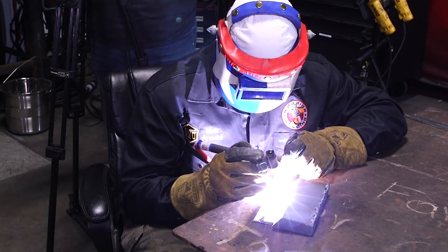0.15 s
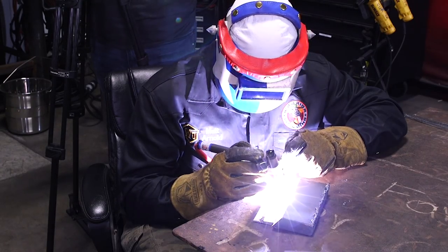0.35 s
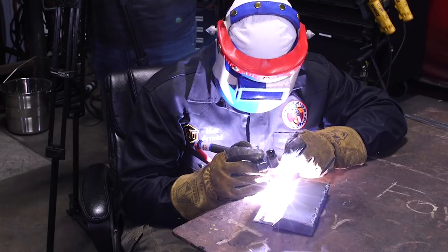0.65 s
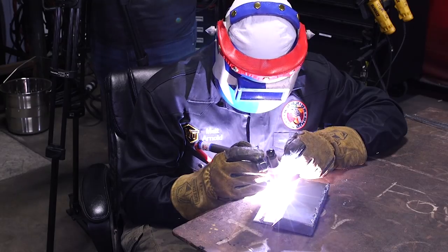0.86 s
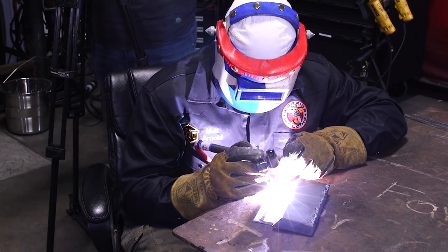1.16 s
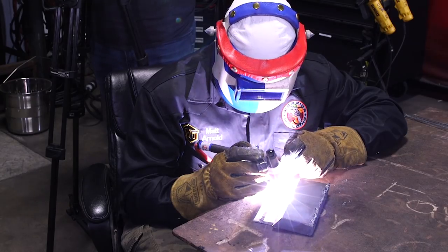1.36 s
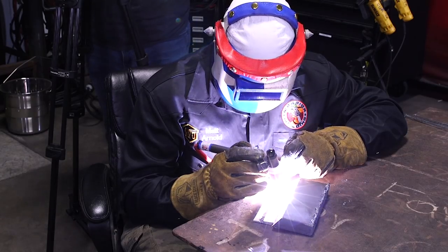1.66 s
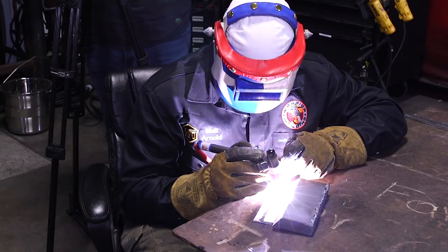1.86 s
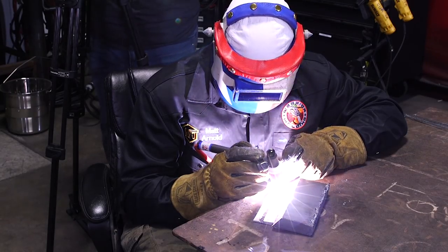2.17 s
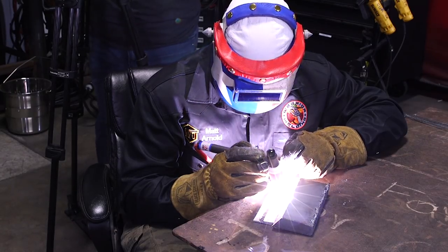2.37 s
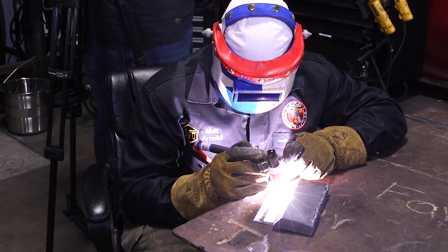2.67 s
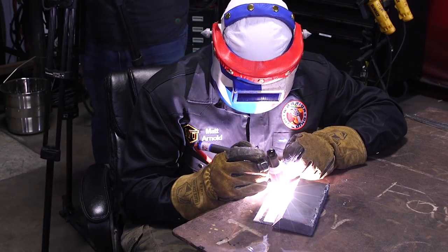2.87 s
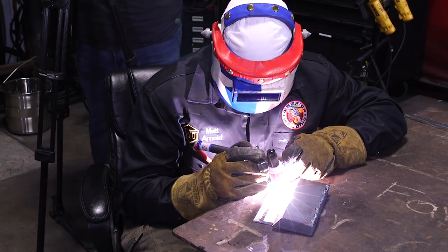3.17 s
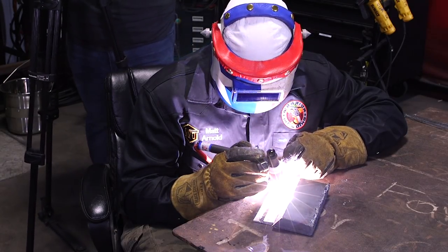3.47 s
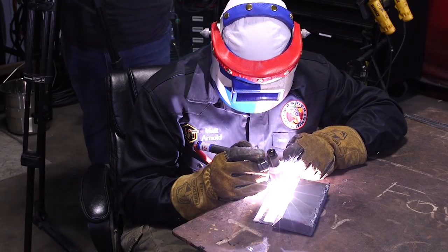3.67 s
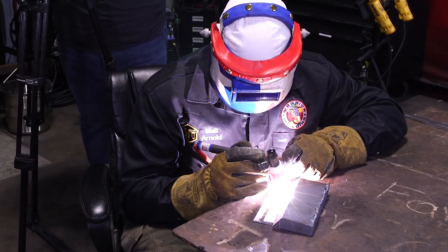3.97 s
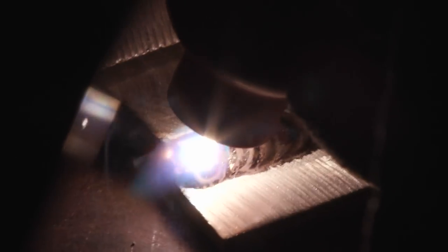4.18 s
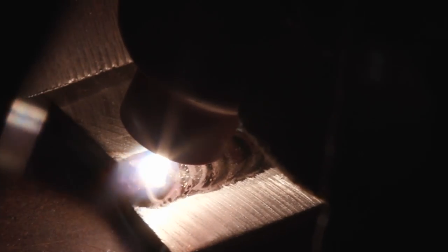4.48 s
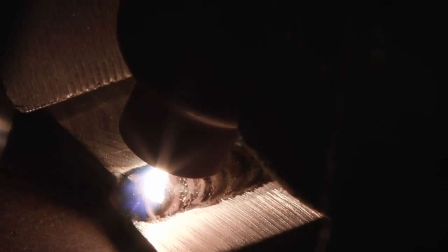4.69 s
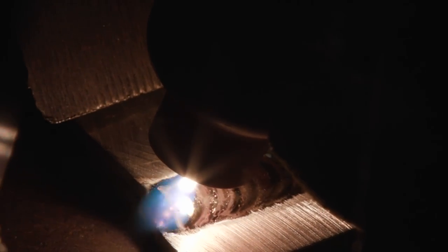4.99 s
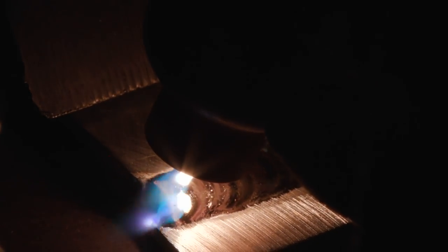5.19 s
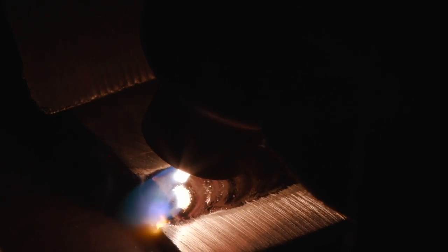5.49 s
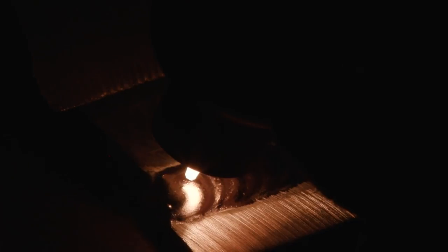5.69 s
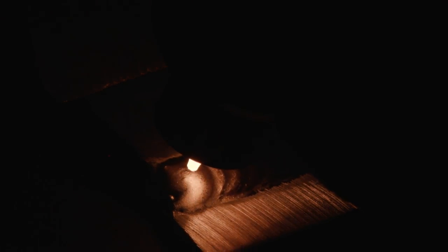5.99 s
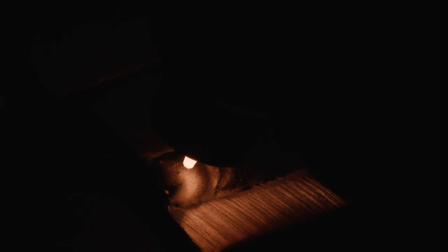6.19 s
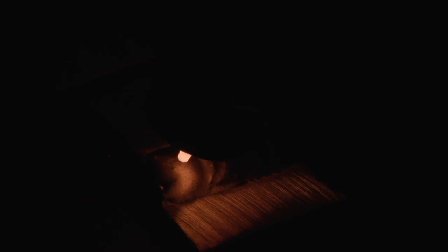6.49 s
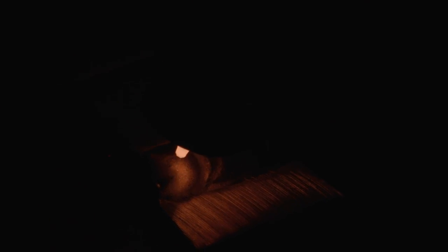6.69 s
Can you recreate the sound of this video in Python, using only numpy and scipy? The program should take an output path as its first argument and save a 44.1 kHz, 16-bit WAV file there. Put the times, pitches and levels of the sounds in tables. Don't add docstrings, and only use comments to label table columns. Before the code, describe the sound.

A welding arc on a steel bench buzzes harshly a step from the microphone, a raspy hundred-per-second electrical drone with sizzling treble. It wavers as filler rod dips, weakens after about four seconds, drops and sputters near five and a half, then stops just after six. Soft gas hiss, fan hum and faint low thuds remain in the workshop.

```python
import sys
import numpy as np
from scipy import signal
from scipy.fft import rfft, irfft
from scipy.io import wavfile
from scipy.ndimage import uniform_filter1d

SR = 44100
rng = np.random.default_rng(int(sys.argv[2]) if len(sys.argv) > 2 else 0)


def volts(x):
    e = np.asarray(x, float) / 20
    return 10 ** e


def dump(signal):
    limited = np.clip(np.atleast_2d(signal).T, -1, 1)
    pcm = np.round(limited * 32767).astype(np.int16)
    wavfile.write(sys.argv[1], SR, pcm)


N = 302085
HZ = np.fft.rfftfreq(N, 1 / SR)
CYCLE_S, CYCLES, STRIKE_S, RETURN_S = 441.015 / 44100, 625, .006562, .009022

# (time [s], current [dB], lean towards the strike and away from the return [dB])
PEDAL_MOVES = [(0, -33.5, -1.5), (.45, -32, -1.5), (.95, -32.5, -2.5), (1.6, -33, -2), (1.95, -33.5, 0),
               (2.25, -37, 0), (2.6, -35.5, -1.5), (3.1, -35.5, 0.5), (3.45, -39.5, -3.5), (3.7, -36, -1.5),
               (4.0, -38, 1.5), (4.5, -38.5, -1.5), (4.95, -39, -4.5), (5.2, -44, -1.5), (5.45, -52.5, 2.5),
               (5.62, -51.5, 6.5), (5.8, -44, 7.5), (6.25, -43.5, 8)]
# (time [s], strike [dB], return [dB])
ROD_DIPS = [
    (.98, -3, -3.5),
    (2.72, -2, -5.5),
    (3.13, -2, -2.5),
    (4.05, -2, -4.5),
    (4.59, -1, -5),
]
# (time [s], level [dB])
ODD_CYCLES = [(2.78, -3), (3.11, -3), (3.45, -5), (4.61, -5), (4.70, 3), (4.82, -4), (4.87, -6), (4.91, 3),
              (4.97, 3), (5.00, -4), (5.02, -5), (5.05, 4), (5.13, 3), (5.67, -4), (5.69, -3), (5.74, -4),
              (5.75, -4), (5.77, -3), (5.79, -8), (5.80, -10), (5.88, -4), (5.94, -7), (5.95, -6)]
# (time [s], echo off the filler hand [0-1], torch lift [0-1])
HANDS = [
    (0, 0, 0),
    (1.0, 0, 0),
    (1.3, 0.3, 0.04),
    (2.0, 0.6, 0.06),
    (3.5, 0.9, 0.09),
    (4.8, 1, 0.14),
    (5.2, 1, 0.47),
    (5.7, 0.3, 1),
]
# (pitch [Hz], width [Hz], strike [dB], return [dB])
GAP_TORCH_LOW = [(369, 147, 2, -3), (1290, 1045, -4, 0), (3083, 890, -2.5, -6), (4205, 570, -4.5, -13),
                 (5095, 440, -11.5, -14.5), (5887, 1100, -12.5, -16), (6925, 440, -6.5, -9.5)]
# (pitch [Hz], width [Hz], level [dB])
GAP_TORCH_LIFTED = [(398, 63, -18), (1310, 1000, -0.5), (2640, 450, -5), (3730, 650, -2.5),
                    (4780, 340, -12), (5670, 1300, -13.5), (6940, 530, -23)]
# (pitch low [Hz], pitch lifted [Hz], width [Hz], level low [dB], level lifted [dB])
CUP_MODES = [(9150, 8600, 650, -23, 4.5), (9370, 9600, 740, -6.5, -5), (10320, 9200, 1400, -3, -21),
             (11100, 10880, 690, 0.1, -0.5), (12300, 11800, 700, -16, -7), (13500, 13300, 770, -12, -2),
             (14700, 15200, 870, -6.5, -1.5), (15900, 19000, 300, -6, -12)]
# (frequency [Hz], level [dB])
FIZZ_COLOUR = [(200, 2), (600, 2), (1500, 11), (3000, 3), (6000, -3.5), (8500, -5), (11000, -50),
               (12800, -22), (15500, -16)]
# (frequency [Hz], time to fall 60 dB [s])
WALL_DECAY = [(300, 1), (1500, 0.49), (5000, 0.71), (14000, 0.031)]
# (frequency [Hz], level [dB per Hz])
HISS_COLOUR = [(450, 0), (700, -2.5), (1900, -2.5), (3000, -17), (3850, -9), (5100, -26.5), (5900, -17),
               (6500, -23), (7800, -12.5), (8600, -30), (9500, -21.5), (12600, -33), (14100, -52),
               (15400, -33)]
# (frequency [Hz], level [dB per Hz])
DRONE_COLOUR = [(110, -8), (200, -0.5), (300, -0.5), (450, -4.5)]
# (pitch [Hz], level [dB rms])
FAN_LINES = [(60, -87), (120, -78), (240, -66.5), (366, -72.5), (414, -67)]
# (start [s], length [s], level [dB])
FLOOR_THUDS = [(0.03, 0.21, -56), (0.337, 0.15, -64), (1.094, 0.26, -58), (1.429, 0.37, -61),
               (2.5, 0.28, -62), (2.911, 0.12, -60), (3.273, 0.048, -68), (3.647, 0.34, -55.5),
               (4.18, 0.2, -61), (4.697, 0.044, -61), (5.053, 0.22, -57), (5.488, 0.167, -68),
               (6.18, 0.36, -55), (6.735, 0.086, -62)]


def arc():
    start = np.arange(CYCLES) * CYCLE_S
    current_db, lean_db = pedal(start)
    strike_db, return_db = current_db + lean_db, current_db - lean_db
    ring_db = -18.5 + 0.71 * current_db + 0.22 * lean_db
    when, *columns = np.transpose(HANDS)
    hand, lift = (np.clip(np.interp(start, when, c), 0, 1) for c in columns)
    weak = np.clip((-42 - ring_db) / 10, 0, 1) * (1 - .7 * lift)

    odd_db = np.zeros(CYCLES)
    for when, step_db in ODD_CYCLES:
        odd_db[round(when / CYCLE_S)] = step_db
    odd_strike_db = odd_db * lift
    odd_return_db = odd_db * (1 - lift)
    chance = rng.standard_normal((5, CYCLES))
    strike = volts(strike_db + odd_strike_db + (0.84 + .5 * weak) * chance[0])
    back = volts(return_db + odd_return_db + (-0.44 + 0.58 * weak) * chance[1])
    ring = volts(ring_db + odd_strike_db + (0.96 + weak) * chance[2])
    jitter_s = 2e-6 + 5e-6 * weak
    on = start + STRIKE_S + jitter_s * chance[3]
    off = start + RETURN_S + jitter_s * chance[4]

    out = gap_snaps(on, off, strike, back, lift, weak)
    out += hand_echo(on, hand * strike)
    out += breath(on, return_db, lift)
    out += cup_rings(on, off, ring, lift, weak)
    out = flange_rattle(out)
    near = 0.034 * late(7.3) - 0.011 * late(6.1) + 0.079 * mode(10800, 2500) * late(9.6)
    out += through(out, near)
    return out + plasma_fizz(on, off, ring)


def pedal(start):
    REHEAT_S = 0.4
    when, *columns = np.transpose(PEDAL_MOVES)
    current_db, lean_db = (np.interp(start, when, c) for c in columns)
    for when, strike_dip_db, return_dip_db in ROD_DIPS:
        chill = (start > when) * np.exp(-abs(start - when) / REHEAT_S) / 2
        current_db = current_db + chill * (strike_dip_db + return_dip_db)
        lean_db = lean_db + chill * (strike_dip_db - return_dip_db)
    return current_db, lean_db


def gap_snaps(on, off, strike, back, lift, weak):
    low, lifted, up = np.transpose(GAP_TORCH_LOW), np.transpose(GAP_TORCH_LIFTED), lift[:, None]
    hz = low[0] + up * (lifted[0] - low[0])
    hz = hz * (1 + 0.0072 * drift(count=len(GAP_TORCH_LOW), cycles=58))
    width = low[1] + up * (lifted[1] - low[1])
    sway_db = 1.63 * drift(count=len(GAP_TORCH_LOW), cycles=19.8)
    sway_db = sway_db + .6 * weak[:, None] * rng.standard_normal(hz.shape)
    strike_modes = hz, width, low[2] + up * (lifted[2] - low[2]) + sway_db
    return_modes = hz, 1.565 * width, low[3] + up * (lifted[2] - low[3]) + sway_db

    bounce_s = .00043 - 0.0001 * lift
    out = rings(on, 0.95 * strike, *strike_modes, rise_ms=0.052)
    out -= rings(on + bounce_s, (0.29 + 0.1 * lift) * strike, *strike_modes, rise_ms=0.049)
    out -= rings(on + 0.000956, 0.12 * strike, *strike_modes, rise_ms=0.079)
    out -= rings(off, 0.82 * back, *return_modes, rise_ms=0.14)
    out += rings(off + bounce_s, 0.51 * back, *return_modes, rise_ms=0.29)
    return out


def hand_echo(on, size):
    echo = puff(0.029) * (late(0.629) - 0.053 * late(1.066))
    return through(clicks(on, size), echo, over=10)


def breath(on, return_db, lift):
    swell = volts(-23 + 0.63 * return_db) * (1 - lift)
    shape = 0.65 * puff(0.28) * late(-0.1)
    shape = shape - 0.86 * puff(0.22) * late(-0.22)
    shape = shape - 0.31 * puff(0.18) * late(1.913)
    return through(clicks(on, swell), shape, over=152)


def cup_rings(on, off, ring, lift, weak):
    hz_low, hz_up, width, db_low, db_up = np.transpose(CUP_MODES)
    count, up, loose = len(CUP_MODES), lift[:, None], weak[:, None]
    hz = (hz_low + up * (hz_up - hz_low)) * (1 + 0.0095 * drift(count=count, cycles=26))
    flutter_db = (.15 + 1.2 * loose ** 2) * rng.standard_normal((CYCLES, count))
    sway_db = (1.6 + 2.5 * loose) * (1 - .7 * up) * drift(count=count, cycles=15) + flutter_db
    cup = hz, width + 0 * up, db_low + up * (db_up - db_low) + sway_db

    slip = (1.0e-6 + 6e-6 * weak ** 2) * rng.standard_normal(CYCLES)
    step = 6e-6 * drift(count=1, cycles=62)[:, 0]
    out = rings(on + slip + 0.0001957, 0.33 * ring, *cup, rise_ms=0.019)
    out += rings(on + slip + 0.0004743 + step, 1.44 * ring, *cup, rise_ms=0.061)
    out += rings(on + slip + 0.001 - step, 0.18 * ring, *cup, rise_ms=0.12)
    out -= rings(off + 0.00023, (0.73 - 0.28 * lift) * ring, *cup, rise_ms=0.087)
    return out


def flange_rattle(x):
    RATTLE_HZ, RATTLE = 4600, .72
    dull = 1 / (1 + (HZ / RATTLE_HZ) ** 6)
    hop = late(1000 / RATTLE_HZ)
    return through(x, dull + (1 - dull) * (RATTLE + hop) / (1 + RATTLE * hop))


def plasma_fizz(on, off, ring):
    size = ring * volts(3.0 * rng.standard_normal(CYCLES))
    flares = clicks(on, size) + 0.7 * clicks(off, size)
    glow = through(flares, SR * 0.00096 / (1 + 2j * np.pi * HZ * 0.00097))
    glow += 0.3 * np.interp(np.arange(N) / SR, on, ring, right=0)
    colour = volts(read(FIZZ_COLOUR, HZ)) * (1 - 0.36 * late(0.411))
    fizz = evened(through(rng.standard_normal(N), colour))
    return volts(-3.5) * glow * fizz


def rings(s, level, hz, width, db, rise_ms):
    at = np.floor(s * SR).astype(int)[:, None] + np.arange(-8, 260)
    t = (at / SR - s[:, None])[:, None]
    hz, width = hz[..., None], width[..., None]
    decay = width * np.exp(-np.pi * width * t)
    waves = volts(db)[..., None] * decay * np.cos(2 * np.pi * hz * t)
    wave = waves.sum(1) * (1 + np.tanh(t[:, 0] * 1000 / rise_ms))
    wave *= 1 - 0.57 * np.exp(-abs(t[:, 0]) / 0.00032)
    wave *= (level * np.sqrt(88 / np.sum(wave ** 2, 1)))[:, None]
    out = np.zeros(N + 300)
    np.add.at(out, at, wave)
    return out[:N]


def drift(count, cycles):
    wander = rng.standard_normal((CYCLES, count))
    for _ in range(2):
        wander = uniform_filter1d(wander, int(cycles), 0)
    return evened(wander)


def clicks(s, size):
    at = np.floor(s * SR).astype(int)[:, None] + np.arange(-12, 13)
    off = at - s[:, None] * SR
    out = np.zeros(N)
    np.add.at(out, at, size[:, None] * np.sinc(off) * np.cos(np.pi * off / 26) ** 2)
    return out


def puff(ms):
    return ms * np.exp(-2 * (np.pi * HZ * ms / 1000) ** 2)


def late(ms):
    return np.exp(-2j * np.pi * HZ * ms / 1000)


def mode(hz, width):
    return 1j * HZ * width / (hz ** 2 - HZ ** 2 + 1j * HZ * width)


def through(x, response, over=0):
    if over:
        response = response * np.sqrt(over / np.sum(irfft(response, N) ** 2))
    return irfft(rfft(x) * response, N)


def read(points, hz):
    f, value = np.transpose(points)
    return np.interp(np.log(hz + 1), np.log(f + 1), value)


def evened(x):
    return x / np.sqrt(np.mean(x ** 2) + 1e-20)


def walls(x):
    hz, t, z = signal.stft(rng.standard_normal(SR // 2), SR, nperseg=256)
    decay_db = -60 * t / read(WALL_DECAY, hz)[:, None]
    tail = signal.istft(z * volts(decay_db), SR, nperseg=256)[1]
    tail[:round(.004 * SR)] = 0
    return signal.fftconvolve(x, tail / np.linalg.norm(tail))[:N]


def shop():
    return gas_and_air() + floor() + fans()


def gas_and_air():
    frames, hz = N // 256 + 5, np.fft.rfftfreq(1024, 1 / SR)
    a, b, patches = rng.standard_normal((frames, 513, 3)).T
    patches = evened(uniform_filter1d(uniform_filter1d(patches, 10, 0), 14, 1))
    drone_db = np.where(hz > 100, read(DRONE_COLOUR, hz) + 5.3, -60)
    colour_db = np.where(hz < 450, drone_db, read(HISS_COLOUR, hz))
    z = (a + 1j * b) * volts(colour_db[:, None] + 1.4 * patches)
    return volts(-56) * evened(signal.istft(z, nperseg=1024, noverlap=768)[1][:N])


def floor():
    response = mode(81, 52) * mode(63, 85) * HZ / (HZ + 15)
    low = evened(through(rng.standard_normal(N), response))
    return volts(-2.0) * rumble(np.arange(N) / SR) * low


def rumble(t):
    RISE_S, FADE_S = 0.028, 0.041
    start, length, db = np.transpose(FLOOR_THUDS)[..., None]
    edge = np.minimum((t - start) / RISE_S, (start + length - t) / FADE_S)
    return volts(-62) + volts(db + 10 * np.clip(edge, -10, 0)).sum(0)


def fans():
    out = np.zeros(N)
    for hz, db in FAN_LINES:
        waver = evened(uniform_filter1d(uniform_filter1d(rng.standard_normal(N), 6000), 6000))
        phase = 2 * np.pi * np.cumsum(hz + .8 * waver) / SR
        out += volts(db + 3 + 1.5 * waver) * np.sin(phase)
    return out


def scene():
    buzz = arc()
    return (buzz + volts(-19.0) * walls(buzz) + shop())[None]


def band_limit(x):
    return signal.sosfilt(signal.butter(12, 16990, fs=SR, output="sos"), x)


def record(dry):
    lowpass = signal.firwin(1023, 15860, window=("kaiser", 9), fs=SR)
    mix = signal.oaconvolve(dry, lowpass[None], "same")
    mix = signal.sosfilt(signal.butter(1, 8, "highpass", fs=SR, output="sos"), mix)
    return band_limit(mix)


dry = scene()
out = record(dry)
dump(out)
```